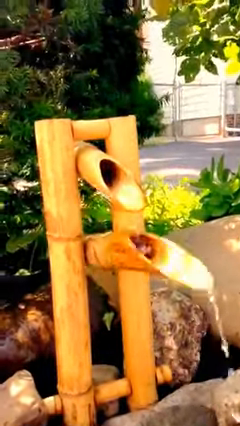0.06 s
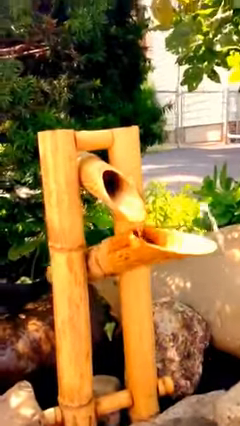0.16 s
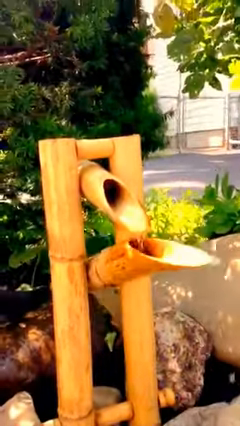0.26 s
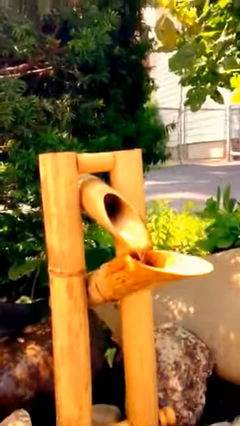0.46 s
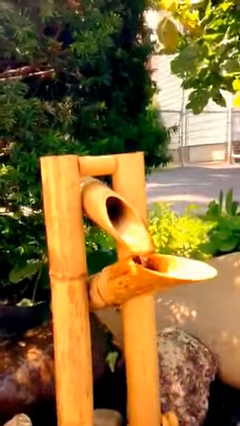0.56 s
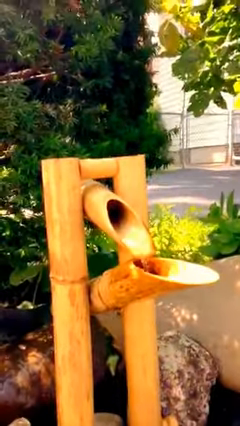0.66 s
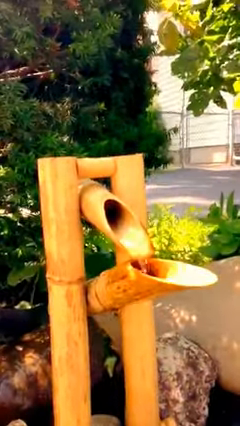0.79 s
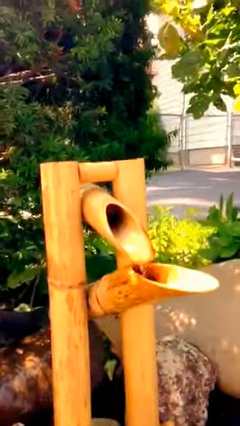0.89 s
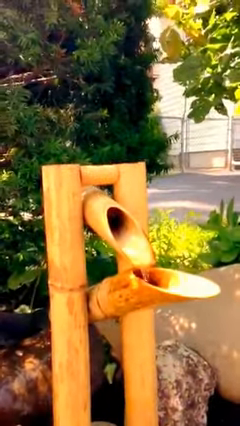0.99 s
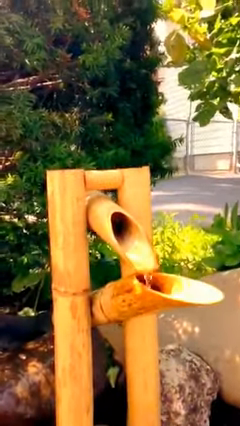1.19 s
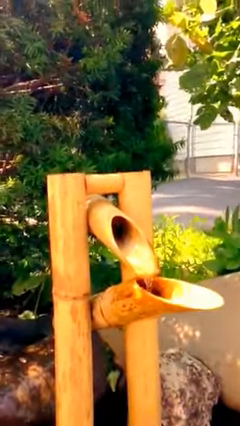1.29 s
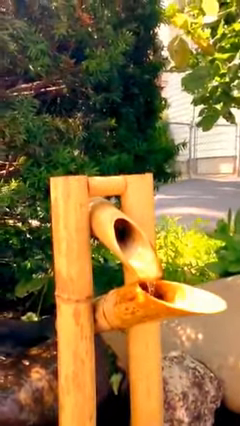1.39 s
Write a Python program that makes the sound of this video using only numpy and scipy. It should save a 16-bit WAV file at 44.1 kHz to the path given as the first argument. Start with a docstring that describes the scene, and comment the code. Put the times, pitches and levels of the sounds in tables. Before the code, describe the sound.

A bamboo fountain tube knocks once, sharp and hollow, over trickling, dripping water.

```python
"""Bamboo rocker fountain in a garden. A thin stream trickles throughout, over low outdoor rumble.
Air hums faintly in the emptied tube as it swings back. At 0.21 s it knocks on its rest: a contact
crack plus ringing modes. It rattles on its axle, then bounces softly at 0.41-0.45 s.
The stream refills it: drops smack on wet bamboo, small bubbles ping, hollow plops ring inside."""
import sys
import numpy as np
from scipy import signal
from scipy.fft import rfft, irfft
from scipy.io import wavfile
from scipy.ndimage import uniform_filter1d

SR = 44100
rng = np.random.default_rng(int(sys.argv[2]) if len(sys.argv) > 2 else 0)


def inscribe(sig):
    """Save sig as 16-bit PCM at rate SR to the path in sys.argv[1].

    A 1-D sig is mono; a 2-D sig holds one channel per row.
    Samples are clipped to [-1, 1] before scaling.
    """
    pcm = np.round(np.clip(np.atleast_2d(sig).T, -1, 1) * 32767)
    wavfile.write(sys.argv[1], SR, pcm.astype(np.int16))


N = 63945
TIME_S = np.arange(N) / SR
AGE_S = np.arange(SR // 4) / SR   # since event onset

# landings on the rest: t/s, level/dB, ring low-pass f/Hz, relative crack level/dB
LANDINGS = [(0.2123, 4, 14300, -20.5), (0.4062, -19.5, 2600, -16.5), (0.4322, -12.5, 595, -25.5),
            (0.4450, -28, 2600, -20)]
# modes rung by a knock, the tube's plus the frame's lowest: f/Hz, level/dB, T60/s
KNOCK_MODES = [(179, -33, 0.067), (243, -27, .04), (357, -16.5, 0.038), (582, -20.5, 0.078),
               (755, -25.5, 0.16), (853, -8, 0.058), (1127, -22.5, 0.072), (1318, -23, 0.067),
               (1460, -24, 0.079), (1714, -20, 0.066), (2119, -18, 0.055), (2486, -30.5, 0.07),
               (2876, -18.5, 0.058), (3030, -26, 0.1), (3200, -32, 0.072), (3480, -34, 0.09),
               (3895, -26, 0.069), (4042, -27, 0.047), (4820, -17, 0.035), (5340, -22, 0.031),
               (6080, -20, 0.029), (6760, -30.5, 0.023), (7970, -29, .028)]
# contact crack spectrum: f/Hz, relative density/dB
CRACK_SPECTRUM = [(50, -35), (110, -29), (200, -9), (350, -6), (470, 4), (800, 1.5), (1500, -4.5),
                  (3000, -6.5), (5000, -7.5), (7000, -11), (10000, -14.5), (12000, -27.5), (15000, -24)]
# clacks of the tube on its axle: t/s, level/dB
CLACKS = [(0.2255, -1.5), (0.2400, -8.5), (0.2480, -3), (0.2590, 2)]
# clack modes: f/Hz, level/dB, T60/s
AXLE_MODES = [(2930, -26, 0.012), (3428, -30, 0.05), (3490, -30.5, 0.028), (3920, -33, 0.031),
              (5050, -34, 0.016)]
# drops on wet bamboo: t/s, level/dB, centre f/Hz, bandwidth/centre
DROP_HITS = [(0.0326, -32.5, 3800, 0.72), (0.1190, -20.5, 7590, 0.039), (0.1835, -26, 8100, 0.47),
             (0.245, -20, 8300, .2), (0.2531, -19, 5940, 0.31), (0.26, -18, 9500, 0.092),
             (0.2732, -16, 6360, .1), (0.2798, -34, 8300, .6), (0.3357, -28, 10300, 0.3),
             (0.3585, -26, 8600, 0.07), (0.3882, -32, 11900, 0.75), (0.4477, -24.5, 10200, 0.11),
             (0.4960, -9, 9500, 0.33), (0.5021, -19, 7200, 0.65), (0.5169, -21.5, 8000, 0.18),
             (0.5350, -37, 13000, 0.36), (0.5465, -30, 5700, 0.37), (0.554, -35, 8000, .7),
             (0.5735, -33.5, 7850, .6), (0.5825, -35.5, 9000, .3), (0.692, -23.5, 9800, 0.12),
             (0.8833, -13, 13600, 0.24), (0.8835, -25, 3600, 1), (0.9220, -31, 4930, .7),
             (1.1339, -33, 4470, 0.55), (1.162, -30, 3500, .8), (1.1656, -18.5, 13200, 0.15),
             (1.1945, -19, 9500, 0.19), (1.255, -34, 8050, 0.95), (1.3123, -37, 6000, 1),
             (1.329, -32, 9400, 0.21), (1.359, -31.5, 9300, 0.092), (1.3755, -36, 4440, 0.8),
             (1.392, -33.5, 9300, 0.22), (1.4153, -28, 4500, 0.69), (1.4216, -36, 5500, .6)]
# single bubbles: t/s, level/dB, start f/Hz
BUBBLE_PINGS = [(0.032, -39.5, 2700), (0.034, -43.5, 1360), (0.0650, -45, 2960), (0.1073, -38, 5470),
                (0.1270, -40, 2270), (0.1400, -40, 2130), (0.1408, -40, 3600), (0.1830, -37.5, 2900),
                (0.1818, -42.5, 1480), (0.3347, -37, 4220), (0.3572, -42, 8070), (0.4590, -43.5, 5700),
                (0.4626, -42, 9400), (0.4700, -41, 2790), (0.486, -36, 5900), (0.4872, -39, 4160),
                (0.523, -45, 5900), (0.5472, -43.5, 4200), (0.643, -40, 7420), (0.6797, -41, 4540),
                (0.6894, -33, 9970), (0.6915, -41.5, 3800), (0.707, -37, 4180), (0.7713, -38.5, 6530),
                (0.7818, -40, 4420), (0.8248, -47, 1370), (0.9215, -46, 2150), (1.0262, -43, 3070),
                (1.1942, -40, 3600), (1.2748, -37, 4030), (1.3006, -44, 2900), (1.407, -41.5, 3700),
                (1.416, -36.5, 6090), (1.42, -40, 3350)]
# plops inside the tube: t/s, level/dB, f/Hz
TUBE_PLOPS = [(0.1850, -42.5, 930), (0.2810, -41.5, 886), (0.3400, -41.5, 874), (0.3880, -40, 814),
              (0.7340, -45.5, 958), (0.8845, -30, 846), (1.1140, -45.5, 985), (1.1380, -40.5, 960)]
# gain of trickle and wash: t/s, level/dB
FLOW_CURVE = [(0, 2.5), (0.2, -0.5), (0.5, -1.5), (0.62, -1.5), (0.85, -1.5), (1.05, -3), (1.2, 0),
              (1.45, -2)]
# running water spectrum: f/Hz, relative density/dB
WASH_SPECTRUM = [(200, -28), (480, -13.5), (680, -1), (950, -1.5), (1400, -4.5), (2200, -11), (4200, -11),
                 (7000, -21), (15000, -23.5)]
# far rumble envelope: t/s, level/dB
RUMBLE_CURVE = [(0, -61), (0.3, -58.5), (0.5, -59), (0.62, -63.5), (0.85, -62.5), (0.98, -59), (1.1, -63),
                (1.28, -57.5), (1.45, -62.5)]
# far rumble spectrum: f/Hz, relative density/dB
RUMBLE_SPECTRUM = [(30, -44), (60, -43), (100, -12), (160, -1), (235, 0), (310, -11), (480, -18),
                   (1000, -36)]


def tube_knocks(contact_s=.0108, release_s=.00049, free_ring_db=-6.5, crack_tail_db=-9):
    """Each landing cracks and rings the tube and its frame, loudest in contact; soft ones favour the low modes."""
    out = np.zeros(N)
    contact = .5 - .5 * np.tanh((AGE_S - contact_s) / release_s)
    modes = sum((-1) ** k * from_db(db) * mode(hz, t60_s)
                for k, (hz, db, t60_s) in enumerate(KNOCK_MODES))
    ring = modes * rise(tau_s=.004) * (contact + (1 - contact) * from_db(free_ring_db))
    crack_envelope = rise(tau_s=.00036) * decay(t60_s=.089)
    crack_envelope *= contact + (1 - contact) * from_db(crack_tail_db)
    for t_s, db, top_hz, crack_db in LANDINGS:
        body = low_pass(ring, top_hz, order=2)
        crack = from_db(crack_db) * coloured_noise(CRACK_SPECTRUM, len(AGE_S)) * crack_envelope
        add(out, t_s, from_db(db) * (body + low_pass(crack, top_hz + 1500)))
    return out


def axle_rattle():
    """The tube clacks on its axle just after the knock, ringing short bright modes."""
    out = np.zeros(N)
    ring = rise(tau_s=.00071) * sum(from_db(db) * mode(hz, t60_s) for hz, db, t60_s in AXLE_MODES)
    for t_s, db in CLACKS:
        add(out, t_s, from_db(db) * ring)
    return out


def splash(hz, relative_width, smack_db=12.5, spray_db=-10):
    """Drop impact: sharp smack, then grainy spray, band-passed; narrow bands sound pitched."""
    hiss, grains = rng.standard_normal((2, len(AGE_S)))
    spray = from_db(spray_db) * grains * decay(t60_s=.033)
    burst = hiss * (decay(t60_s=.0015) + spray)
    burst[0] = from_db(smack_db)
    radius = np.exp(-np.pi * relative_width * hz / SR)
    feedforward = np.array([1, 0, -1]) * (1 - radius ** 2) / 2
    feedback = [1, -2 * radius * np.cos(2 * np.pi * hz / SR), radius ** 2]
    return .5 * signal.lfilter(feedforward, feedback, burst + 1e-18)


def bubble(start_hz, life_cycles=52, glide_share=.11):
    """A trapped bubble pings, rising slightly in pitch as it dies."""
    life_s = life_cycles / start_hz
    pitch_hz = start_hz * (1 + glide_share * np.minimum(AGE_S / life_s, 1))
    return np.sin(2 * np.pi * np.cumsum(pitch_hz) / SR) * rise(1 / start_hz) * decay(life_s)


def drips():
    """The stream fills the tube: distinct splashes, bubbles trapped by a splat, hollow plops."""
    out = np.zeros(N)
    for t_s, db, hz, relative_width in DROP_HITS:
        add(out, t_s, from_db(db) * splash(hz, relative_width))
    for t_s, db, hz in BUBBLE_PINGS:
        splat = from_db(3) * splash(hz, relative_width=.65)
        add(out, t_s, from_db(db) * (bubble(hz) + splat))
    for t_s, db, hz in TUBE_PLOPS:
        add(out, t_s, from_db(db) * mode(hz, t60_s=.06) * rise(tau_s=.0019))
    return out


def trickle():
    """Many faint bubbles and droplets at random times and pitches."""
    out = np.zeros(N)
    for t_s, db, hz in random_events(per_s=380, min_db=-56, spread_db=3.5, low_hz=891, high_hz=10740):
        add(out, t_s, from_db(db) * bubble(hz))
    for t_s, db, hz in random_events(per_s=110, min_db=-44, spread_db=4, low_hz=2480, high_hz=11800):
        add(out, t_s, from_db(db) * splash(hz, relative_width=.35))
    return out


def garden_echoes(x, gain_db=-26.5):
    """Short, dull scatter from rocks and hedge."""
    scatter = low_pass(rng.standard_normal(len(AGE_S)), hz=8100)
    response = scatter * decay(t60_s=.16) * rise(tau_s=.009) ** 2
    return from_db(gain_db) * signal.fftconvolve(x, response / np.linalg.norm(response))[:N]


def air_column(hz=239, half_width_hz=26.5, peak_db=-57, peak_s=.26, sigma_s=.17):
    """Air in the emptied tube resonates: a faint hum that swells and fades."""
    resonance = 1 / (1 + ((np.fft.rfftfreq(N, 1 / SR) - hz) / half_width_hz) ** 2)
    hum = unit_rms(irfft(rfft(rng.standard_normal(N)) * resonance, N))
    swell = np.exp(-.5 * ((TIME_S - peak_s) / sigma_s) ** 2)
    return from_db(peak_db) * hum * swell


def water_wash(base_db=-57.5, flicker_db=2):
    """Blurred hiss of running water; the level flickers slightly."""
    flicker = unit_rms(uniform_filter1d(rng.standard_normal(N), size=1200))
    return from_db(base_db + flicker_db * flicker) * coloured_noise(WASH_SPECTRUM, N)


def far_rumble():
    """Low outdoor noise, drifting in level."""
    return gain_curve(RUMBLE_CURVE) * coloured_noise(RUMBLE_SPECTRUM, N)


def random_events(per_s, min_db, spread_db, low_hz, high_hz):
    """Yield uniform t/s, capped exponential level/dB, log-uniform f/Hz."""
    for when, size, pitch in rng.random((int(per_s * N / SR), 3)):
        db = min_db + spread_db * min(-np.log(size), 2)
        yield when * N / SR, db, low_hz * (high_hz / low_hz) ** pitch


def mode(hz, t60_s):
    """Damped sine."""
    return np.sin(2 * np.pi * hz * AGE_S) * decay(t60_s)


def decay(t60_s):
    """Envelope losing 60 dB in t60_s."""
    return np.exp(-np.log(1000) * AGE_S / t60_s)


def rise(tau_s):
    """Exponential approach to one."""
    return 1 - np.exp(-AGE_S / tau_s)


def from_db(db):
    """Decibels to gain."""
    return 10 ** (np.asarray(db) / 20)


def gain_curve(curve):
    """dB breakpoints to gain per sample."""
    return from_db(np.interp(TIME_S, *np.transpose(curve)))


def unit_rms(x):
    """Scale to unit power."""
    return x / np.sqrt(np.mean(x ** 2) + 1e-20)


def add(out, t_s, sound):
    """Mix a sound in at t_s."""
    start = int(t_s * SR)
    out[start:start + len(sound)] += sound[:N - start]


def low_pass(x, hz, order=1):
    """Butterworth treble roll-off."""
    return signal.sosfilt(signal.butter(order, hz, fs=SR, output="sos"), x)


def coloured_noise(spectrum, samples):
    """Unit-power noise with the given spectrum."""
    hz, db = np.transpose(spectrum)
    bins_hz = np.maximum(np.fft.rfftfreq(samples, 1 / SR), 1)
    gain = from_db(np.interp(np.log(bins_hz), np.log(hz), db))
    return unit_rms(irfft(rfft(rng.standard_normal(samples)) * gain, samples))


def scene():
    """Fountain, echoes, trickle and background; mono."""
    flow = gain_curve(FLOW_CURVE)
    background = far_rumble() + air_column() + flow * water_wash()
    fountain = tube_knocks() + axle_rattle() + drips()
    return (fountain + garden_echoes(fountain) + flow * trickle() + background)[None]


def record(dry):
    """Steep elliptic low-pass."""
    cutoff_hz = 15300
    return signal.sosfilt(signal.ellip(10, .2, 70, cutoff_hz, fs=SR, output="sos"), dry)


dry = scene()
out = record(dry)
inscribe(out)
```